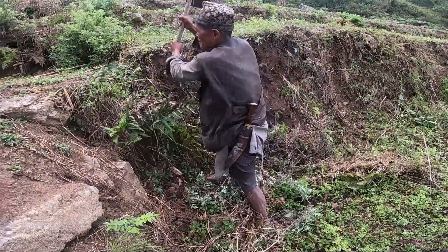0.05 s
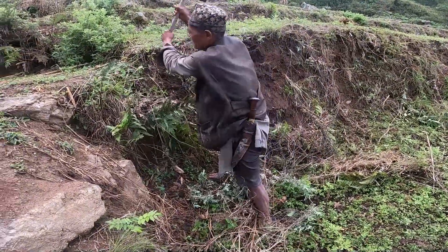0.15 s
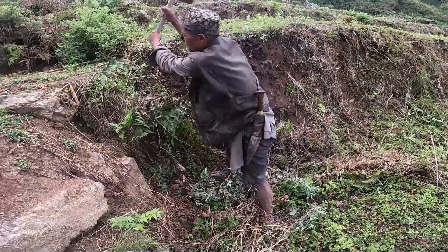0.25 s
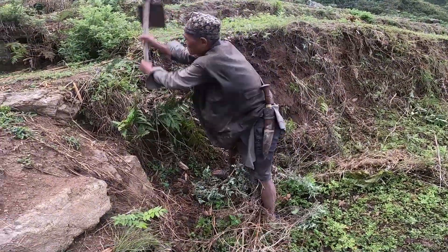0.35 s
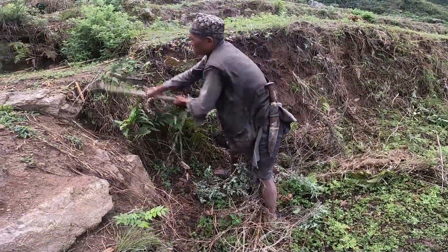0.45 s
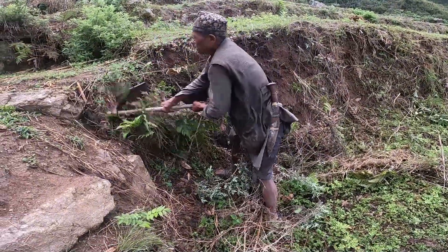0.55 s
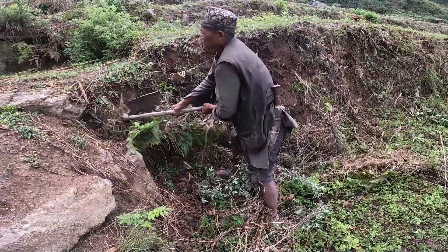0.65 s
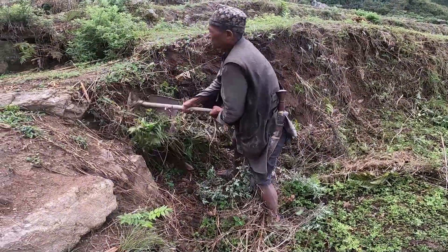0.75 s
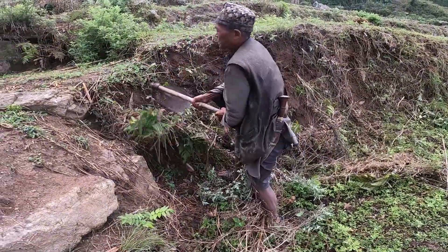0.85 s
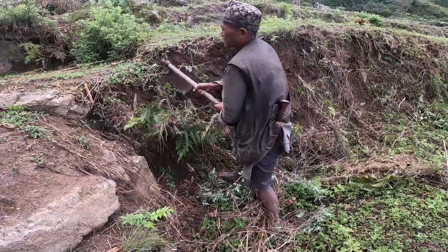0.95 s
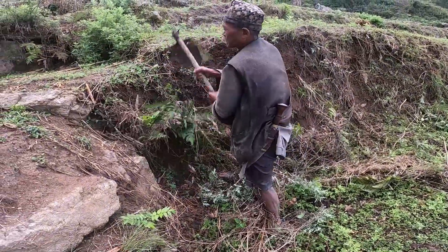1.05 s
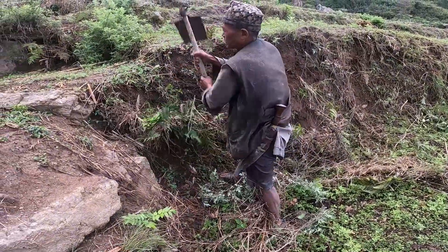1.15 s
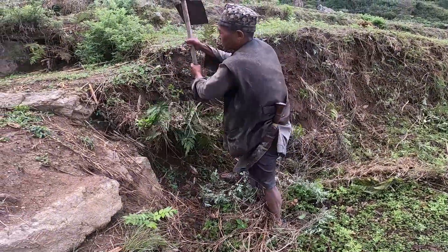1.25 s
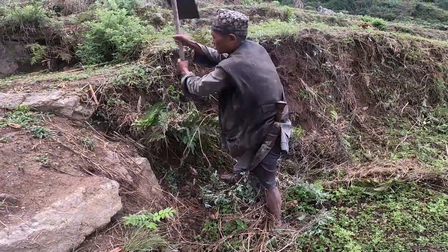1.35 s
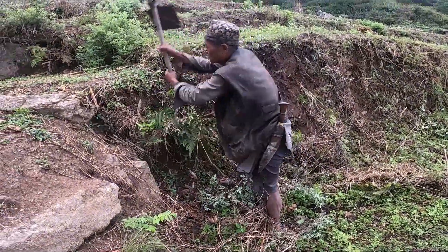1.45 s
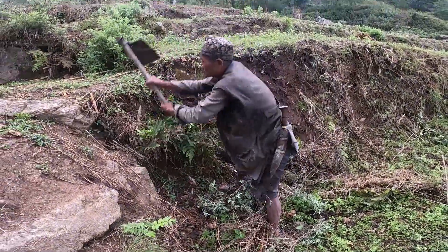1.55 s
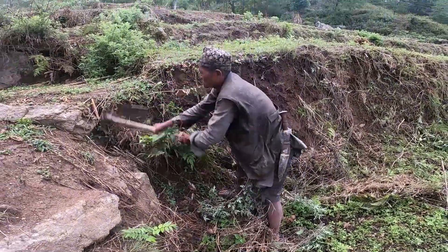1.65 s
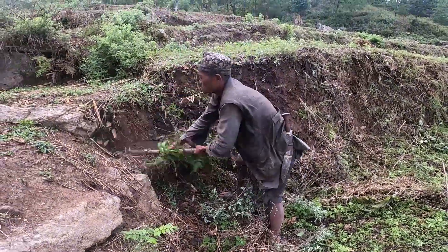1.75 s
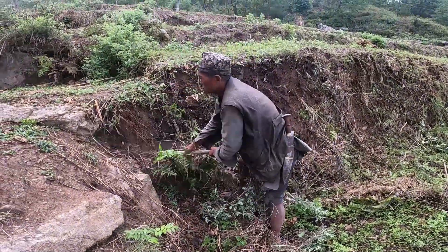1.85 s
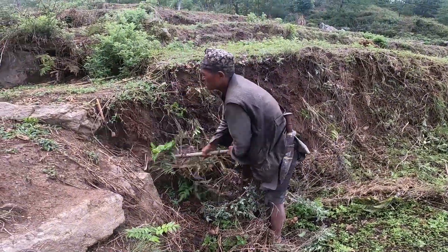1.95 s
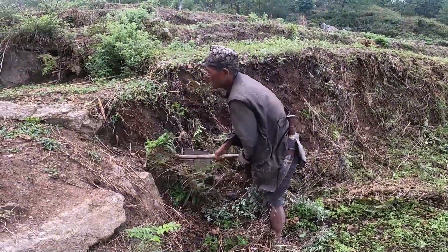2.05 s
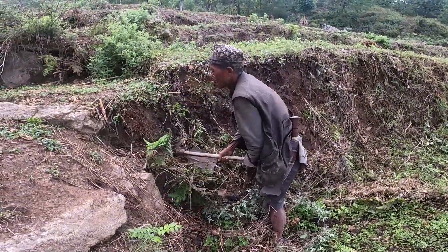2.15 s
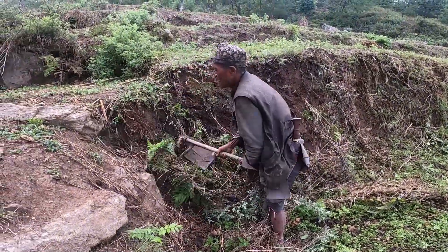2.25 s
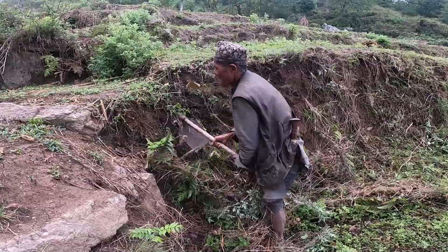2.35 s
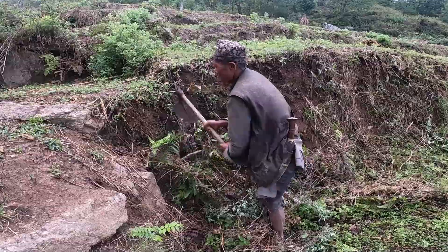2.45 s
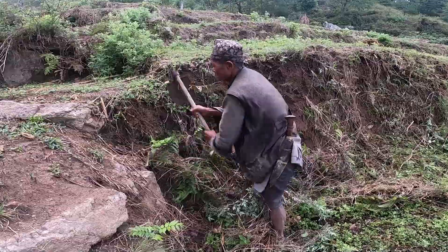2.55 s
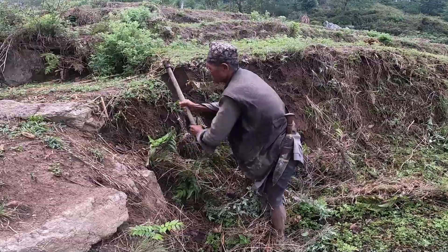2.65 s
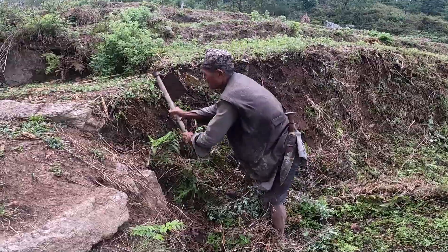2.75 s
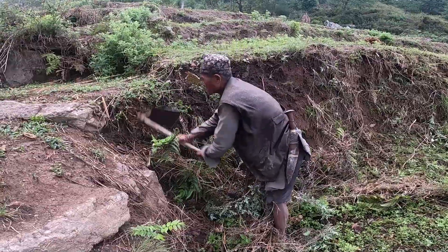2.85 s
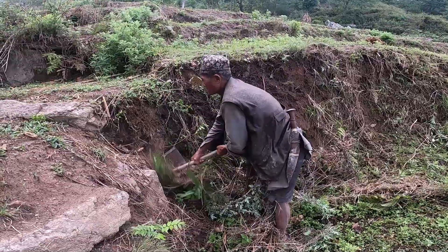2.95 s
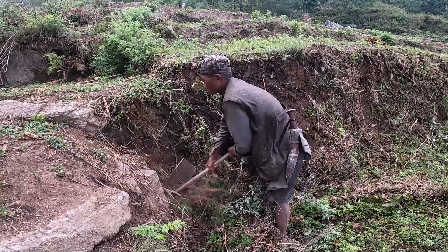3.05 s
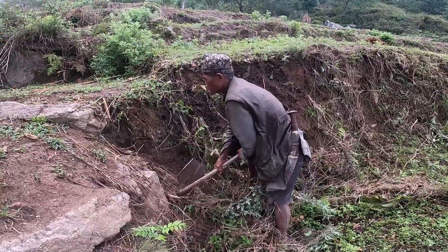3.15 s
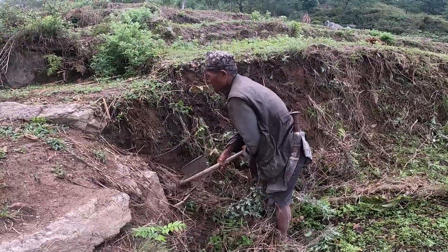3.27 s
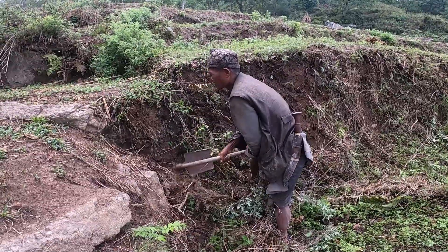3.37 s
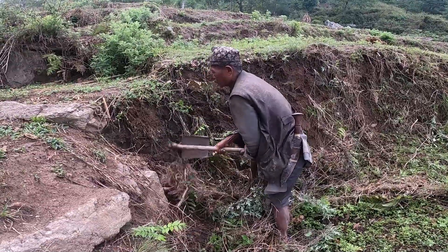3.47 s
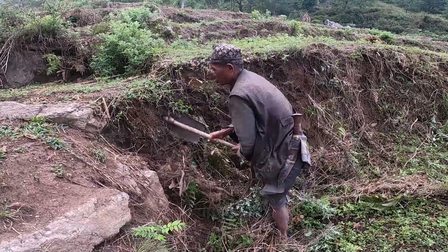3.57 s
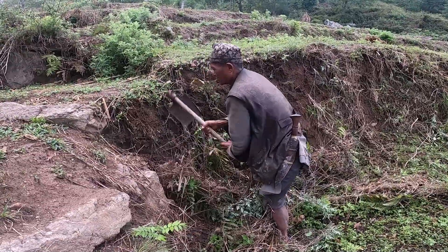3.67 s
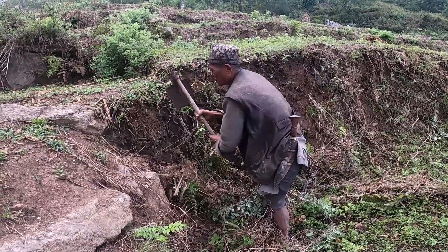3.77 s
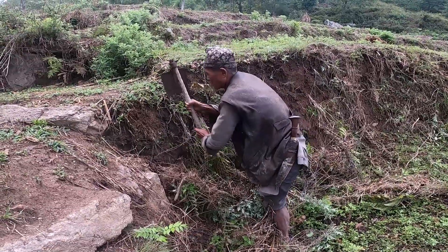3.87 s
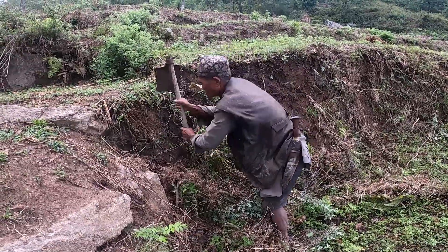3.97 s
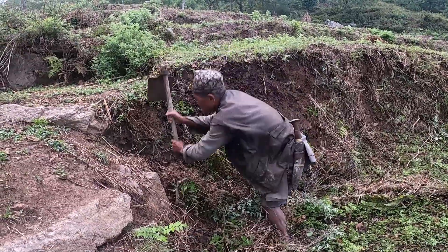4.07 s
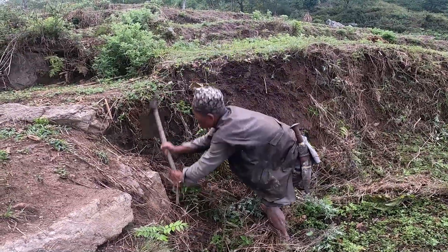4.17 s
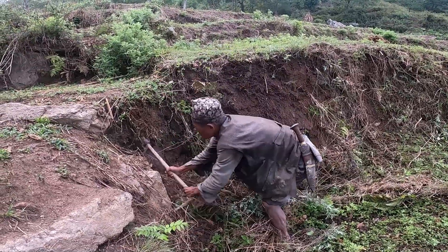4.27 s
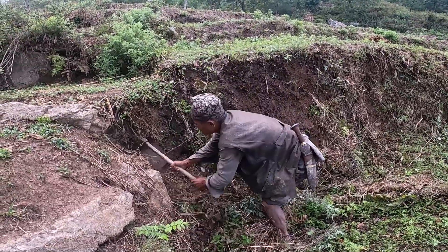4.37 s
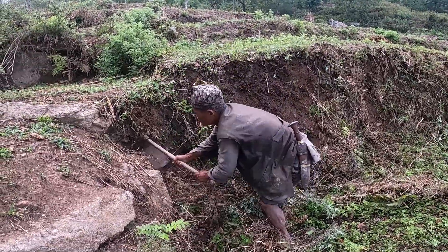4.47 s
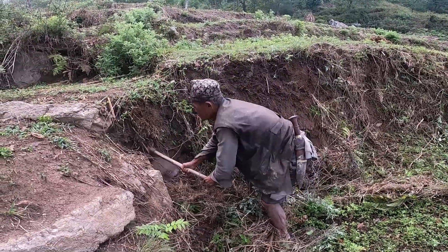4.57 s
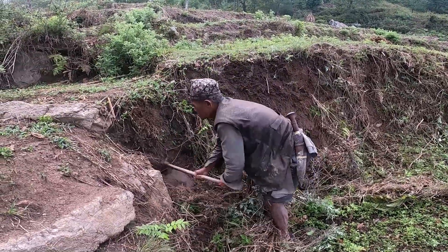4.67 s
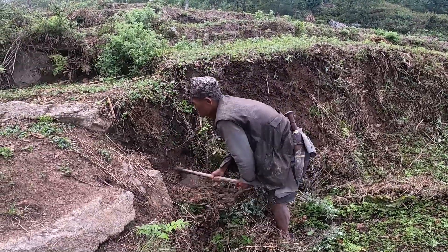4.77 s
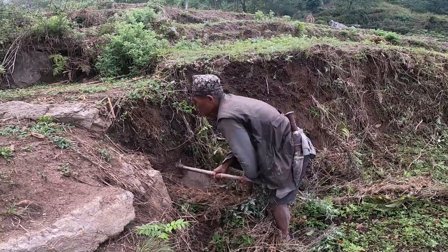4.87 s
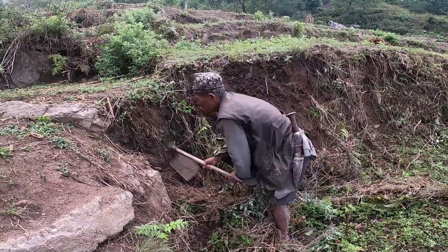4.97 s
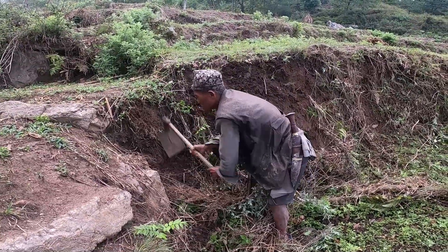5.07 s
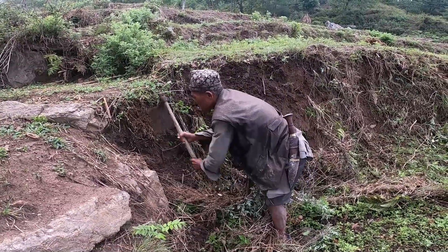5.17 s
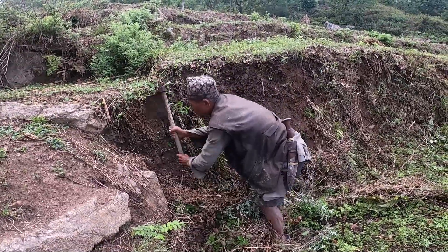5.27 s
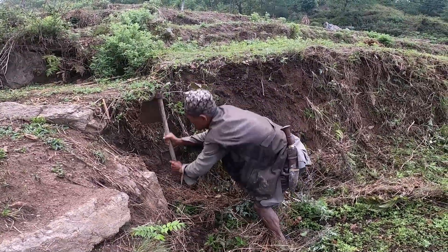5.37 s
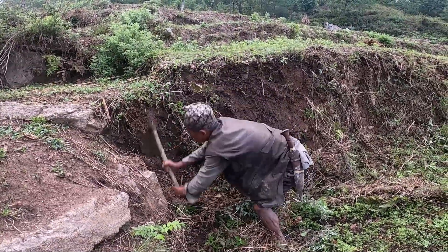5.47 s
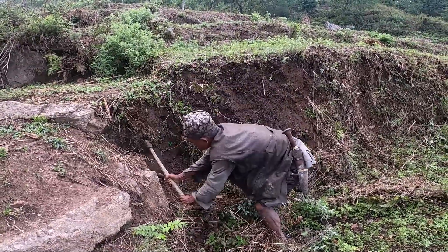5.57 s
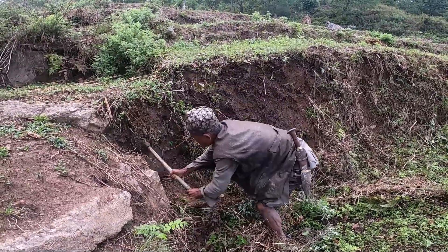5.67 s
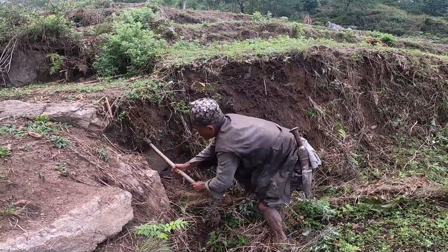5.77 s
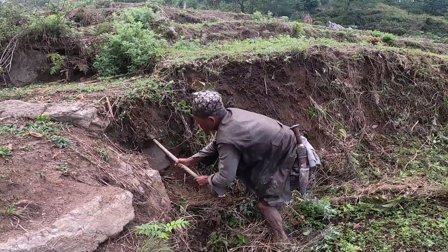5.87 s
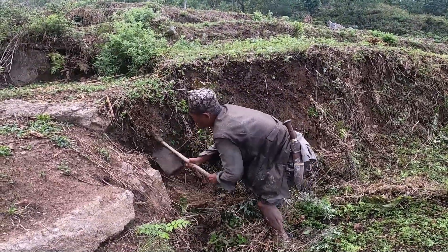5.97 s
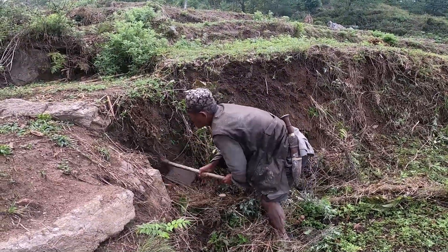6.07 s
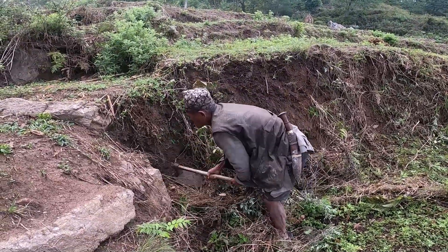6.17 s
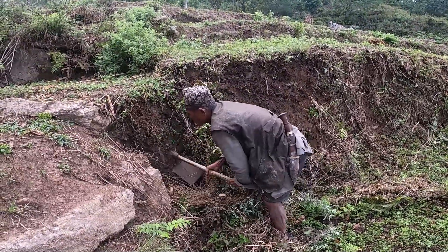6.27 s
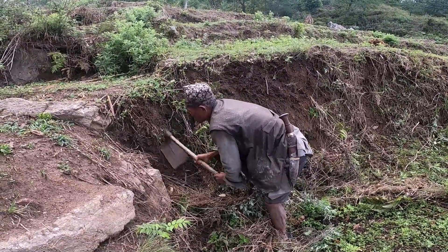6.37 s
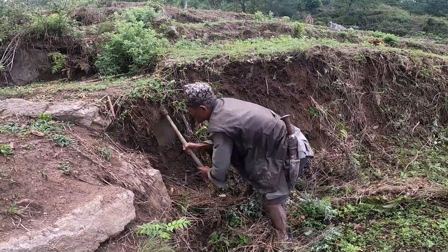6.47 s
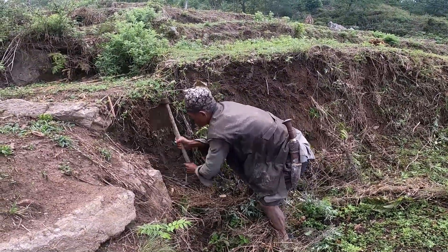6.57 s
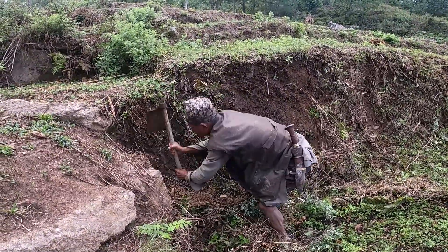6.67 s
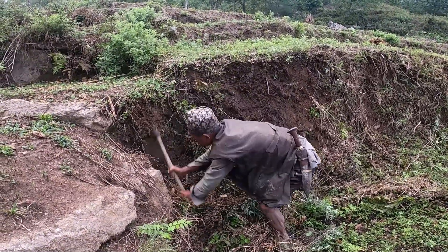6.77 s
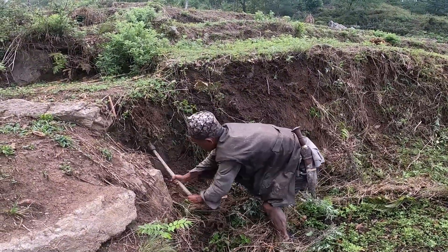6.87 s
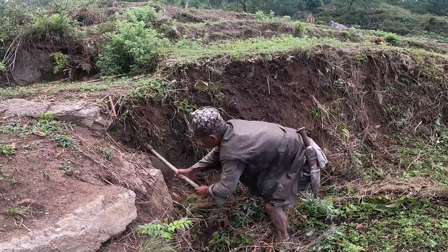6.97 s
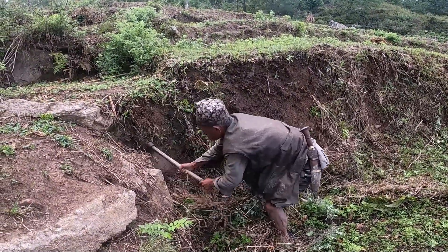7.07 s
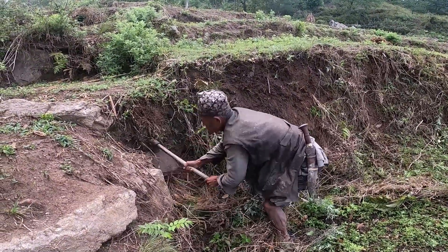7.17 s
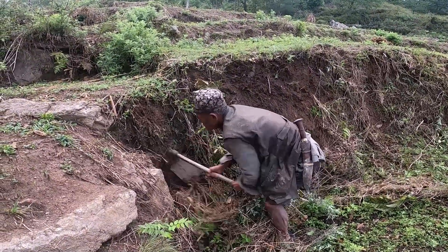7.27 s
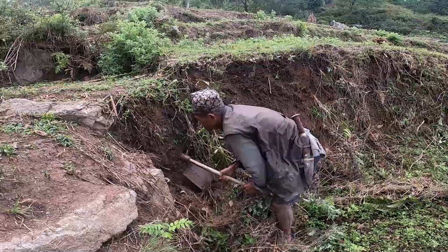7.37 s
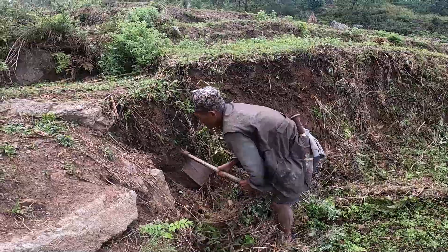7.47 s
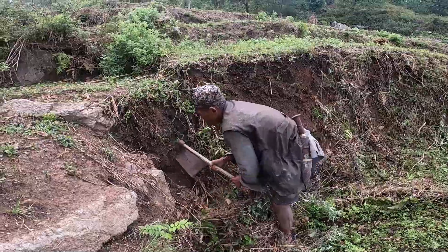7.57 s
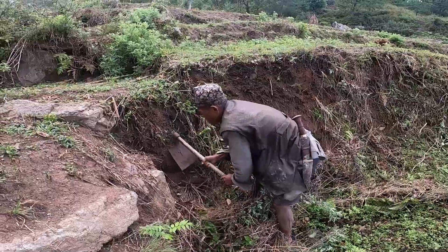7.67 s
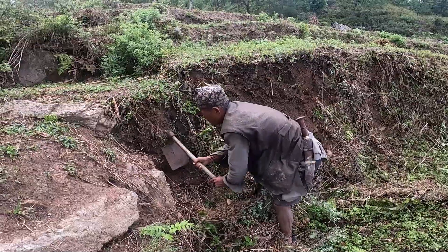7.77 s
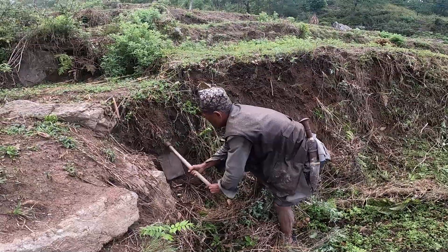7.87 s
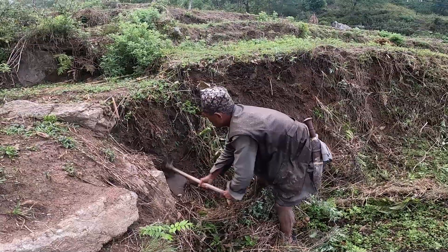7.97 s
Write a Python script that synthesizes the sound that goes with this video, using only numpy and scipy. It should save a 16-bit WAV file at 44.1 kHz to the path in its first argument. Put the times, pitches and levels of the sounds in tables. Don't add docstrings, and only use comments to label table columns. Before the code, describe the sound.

A quiet, open hillside with a soft airy hiss and a few faint bird whistles. At about 0.6 s a steel hoe bites into an earth bank with a gritty crunch and deep thump; crumbs and grit pour down until about 1.5 s. At 1.8 s comes the loudest blow, a hard, hollow double knock on stone with a short blade ring, then soil spilling past 2 s and a small knock at 2.4. Another crunching stony blow lands at 3.05 s, with pebbles ticking to 3.6. Further chops fall at 4.4 s, with pattering clods after, and at 5.65 s, short and thumpy. At 6.05 and 6.24 s the blade clangs brightly against stones. A duller blow at 6.95 s leads to rattling clods and pouring grit around 7.2-7.5 s, then it fades. Distant three-note bird clucks recur from 2.8 s, clearest from 3.5 s, with a tiny trill near 6.4-7 s.

```python
import sys
import numpy as np
from scipy import signal
from scipy.fft import rfft, irfft
from scipy.io import wavfile

SR = 44100
rng = np.random.default_rng(int(sys.argv[2]) if len(sys.argv) > 2 else 0)


def pcm_store(signal):
    levels = np.round(np.clip(np.atleast_2d(signal), -1, 1) * 32767)
    wavfile.write(sys.argv[1], SR, levels.astype(np.int16).T)


def gain_from_db(level_db):
    decades = np.asarray(level_db, float) / 20
    return 10 ** decades


N = 353814

# f/Hz, level/dB per Hz
AIR_COLOUR = [(15, -47), (25, -23), (97, -30), (212, 16.5), (463, 1), (734, -33), (1070, 11.5),
              (2350, -4.5), (4250, 13), (5280, -21), (12200, -25), (14800, -21), (16000, -54)]
# f/Hz, level/dB per Hz
GRIT_COLOUR = [(240, -42), (400, -2), (676, -8.5), (1030, -3.5), (1270, -9.5), (1630, 6), (3870, 8),
               (5690, -4), (8630, -0.5), (10100, -4.5), (12300, -15), (15000, -23), (16000, -39)]
# f/Hz, level/dB per Hz
SHEAR_COLOUR = [(130, 5), (300, -1), (600, 0), (1000, 2.5), (1800, 4.5)]
# f/Hz, likeness/0 to 1
EAR_LIKENESS = [(60, .997), (500, .985), (1500, .97), (3000, .93), (6000, .85), (15000, .5)]
# f/Hz, level/dB
LEFT_LEAN = [(60, .55), (180, .8), (550, .5), (800, 1.5), (1500, .6), (2900, 3.1), (4500, 1.1), (6500, -.5),
             (10000, -1.3), (14000, -5)]
# f/Hz, phase/rad
LEFT_LEAD = [(60, -.06), (250, -.12), (800, -.3), (1500, -.27), (2800, -.55), (6500, -.62), (12000, -.45)]
# f/Hz, level/dB
MIC_TREBLE = [(8000, -2.5), (10000, -0.5), (12500, -3), (14500, -8.5), (15700, -2.5)]

# start t/s, top t/s, end t/s, top f/Hz, level/dB
WHISTLE_ARCHES = [(.115, .12, .195, 1890, -57), (.222, .265, .33, 1660, -58),
                  (2.315, 2.33, 2.385, 2310, -59), (3.74, 3.84, 3.93, 1330, -63),
                  (3.74, 3.85, 3.87, 1830, -68), (3.945, 3.99, 4.01, 1270, -66),
                  (3.945, 4.065, 4.15, 1905, -56), (4.16, 4.24, 4.26, 1900, -66),
                  (5.055, 5.065, 5.14, 1900, -57), (.968, .975, 1.05, 1900, -55),
                  (5.16, 5.19, 5.2, 1680, -61), (5.215, 5.222, 5.27, 1660, -60),
                  (7.545, 7.665, 7.77, 1900, -57), (7.82, 7.87, 8.4, 1880, -74)]
# start t/s, end t/s, period/s, from f/Hz, to f/Hz
PIP_TRILL = (6.345, 7.05, .066, 2940, 3110)
# t/s, length/s, f/Hz, level/dB
BIRD_PEEPS = [
    (6.823, 0.042, 2270, -59),
    (6.87, 0.018, 2130, -52),
    (6.853, 0.016, 1900, -53),
    (6.89, .012, 2170, -58),
    (6.855, .02, 3150, -57),
    (6.82, .014, 1070, -58),
]
# t/s, level/dB, pitch/ratio, spacing/s
CLUCK_CALLS = [
    (2.757, -56, .97, .075),
    (3.452, -50, 1.02, .064),
    (4.148, -49, 1.0, .067),
    (4.822, -48, 1.0, .067),
    (5.383, -61, .95, .16),
    (5.506, -48.5, 1.04, .064),
    (6.212, -47, .99, .067),
    (6.665, -64, 1.0, .07),
    (6.911, -49, 1.01, .066),
    (7.629, -50, 1.0, .067),
]
# first f/Hz, settled f/Hz, drop time/s, level/dB, level lost with the drop/dB
CLUCKS = [
    (1210, 770, .026, .5, -19),
    (1130, 770, .018, -3, -12),
    (1100, 850, .016, -3.5, -6),
]

# t/s, flow as grit level/dB, lumpiness/dB
SOIL_FLOW = [(0, -47, -7.5), (.5, -57, -6.5), (.73, -40.5, -9.5), (1.0, -39.5, -6), (1.52, -52.5, -7.5),
             (1.81, -55.5, -12), (1.94, -38, -6), (2.85, -62.5, -5.5), (4.4, -52, -2.5), (4.8, -43.5, -3.5),
             (5.29, -62, -2.5), (5.94, -53.5, -6.5), (6.2, -45.5, -3.5), (6.54, -69, -8.5), (6.86, -61, 1),
             (7.22, -50, -5.5), (7.39, -38.5, -9), (8.02, -66, -2.5)]
# start t/s, deepest t/s, grit level/dB, t60 after/s, coarse relative level/dB
EARTH_BURSTS = [(0.55, 0.583, -26, 0.23, 2.5), (0.742, 0.758, -45.5, 0.41, 0), (0.795, 0.839, -41, 0.23, -2),
                (1.752, 1.812, -26.5, 0.25, -3.5), (1.79, 1.84, -34, 0.097, 1.5),
                (2.994, 3.05, -27, 0.66, -7), (3.2, 3.413, -55, 2.4, -22), (3.532, 3.562, -43, 0.85, 1),
                (4.294, 4.381, -28.5, 0.23, -2), (4.543, 4.602, -46, 0.049, 5.5),
                (4.695, 4.832, -41, 0.47, -3), (5.609, 5.653, -30, 0.095, 1.5),
                (5.94, 6.024, -44.5, 0.19, 7.5), (6.85, 6.951, -38.5, 0.15, 0.5),
                (7.274, 7.28, -47.5, 0.63, 12.5)]
# t/s, peak level/dB, settled f/Hz, t60/s
DEEP_THUMPS = [(0.0, -55, 90, .25), (.578, -21.5, 40.3, 0.26), (1.859, -37.5, 60.5, 0.25),
               (3.053, -36, 45.7, 0.29), (3.555, -58, 50, 0.31), (3.639, -48, 92, 0.12),
               (4.377, -21, 50.7, 0.18), (4.588, -52, 45, 0.49), (5.65, -17.5, 44, 0.13),
               (6.051, -23, 38, 0.15), (6.945, -27, 42.3, 0.17), (7.209, -40, 80, 0.19),
               (7.252, -42, 71, 0.4)]
# t/s, peak level/dB, settled f/Hz, t60/s
HOLLOW_THUDS = [(1.769, -24, 206, 0.043), (1.827, -18, 569, 0.1), (1.847, -5, 210, 0.031),
                (1.939, -40, 242, 0.17), (1.942, -30.5, 663, 0.1), (6.054, -18, 690, 0.028),
                (2.392, -45.5, 229, 0.11), (3.048, -19, 260, 0.05), (3.563, -41, 243, 0.45),
                (4.364, -16, 440, 0.04), (5.652, -25, 150, .06), (5.643, -17, 500, .03),
                (5.66, -28, 300, .06), (7.206, -36, 702, 0.1), (7.064, -27.5, 209, 0.072),
                (7.278, -30.5, 222, 0.14), (7.284, -25, 646, 0.11), (7.322, -29, 627, 0.048)]
# t/s, peak level/dB, f/Hz, snap relative level/dB
LOUD_CRUMBS = [(.76, -32, 2440, -12), (0.839, -29, 1520, -18), (.868, -29, 2600, -12),
               (.995, -40, 1300, -12), (1.029, -39, 2900, -14), (1.076, -28.5, 1150, -25),
               (1.105, -42, 1300, -15), (1.144, -33, 2500, -5), (1.224, -40, 2270, -5),
               (1.254, -37, 2550, -6), (1.383, -43, 3370, -8), (1.483, -41, 2370, -12),
               (1.601, -47, 3600, -1), (1.915, -30, 900, -10), (2.307, -54, 1200, -25),
               (2.424, -37, 3000, -13), (2.543, -39.5, 1670, -38), (2.62, -49, 3600, -5),
               (.618, -27, 1600, -26), (4.338, -45, 2000, -21), (5.607, -33, 2100, -25),
               (4.632, -38, 2090, -15), (2.812, -61, 3000, 13), (2.955, -52, 1610, -22),
               (3.129, -25, 2700, -10), (3.314, -37, 2500, -15), (3.557, -30, 750, -6),
               (3.561, -24, 2400, -10), (4.187, -37.5, 1520, 0), (5.009, -32, 2170, -23),
               (5.308, -50, 2800, -7.5), (6.021, -32, 1530, -3), (6.036, -31, 1100, -12),
               (7.16, -42, 1630, -15), (7.188, -42, 2000, -12), (7.196, -42, 2300, -12),
               (7.216, -27, 1700, -20), (7.279, -27, 1900, -8), (7.288, -22, 1300, -10),
               (7.306, -33, 1700, -10), (7.328, -21, 1600, -15), (7.377, -34, 2040, -3),
               (7.388, -32, 2500, -15), (7.4, -31, 3300, -8), (7.415, -26, 3000, -12),
               (7.445, -34, 3000, -15), (4.572, -29, 1200, -8), (4.58, -32, 1900, -8),
               (4.766, -28, 3400, -12), (4.88, -29, 3400, -12)]
# t/s, peak level/dB, f/Hz, snap relative level/dB
PEBBLE_FALLS = [(.072, -38, 1470, -14), (.544, -42, 1040, -8), (0.729, -44, 1520, 8),
                (1.941, -43, 1540, -33), (2.088, -30.5, 1200, 1), (3.013, -28, 3200, -10),
                (3.555, -25, 2500, -6), (3.939, -37, 1310, -8), (4.45, -33, 720, -3.5),
                (4.536, -37, 1190, 3), (4.566, -33.5, 1660, 1), (4.593, -32, 1140, -10),
                (4.698, -35, 720, -8), (4.757, -28, 1620, -7), (5.593, -28, 2400, -40),
                (5.885, -33, 646, -7), (5.938, -51, 1510, -15), (5.955, -31.5, 646, -7.5),
                (5.978, -31, 1230, -11), (6.299, -50.5, 1520, 12), (6.623, -65, 1540, 19.5),
                (6.856, -40, 710, -35), (7.064, -44, 790, -6), (7.105, -34.5, 1630, -27),
                (7.171, -29, 1950, -20), (7.529, -44, 3050, -12), (0.445, -42.5, 1580, -7),
                (3.185, -28, 1680, -2.5), (5.228, -46, 1610, -15)]
# t/s, peak level/dB, f/Hz, t60/s, snap relative level/dB
STONE_STRIKES = [(.567, -21, 1700, 0.06, -19), (.646, -17, 2300, 0.03, -20), (1.77, -7.5, 1300, 0.057, -41),
                 (1.77, -6.5, 2115, 0.017, -38), (1.829, -6.5, 1248, 0.047, -38),
                 (2.393, -15.5, 1234, 0.038, -69), (3.027, -20, 3300, 0.04, -10),
                 (3.047, -12.5, 1330, 0.052, -18), (4.363, -11, 1760, 0.025, -30),
                 (4.365, -14.5, 1110, 0.037, -43), (4.835, -22.5, 888, 0.032, -11),
                 (5.643, -12, 760, 0.02, -22), (5.65, -14, 1110, 0.025, -30), (5.648, -20, 1700, .04, -20),
                 (6.004, -21, 1660, 0.035, -12), (6.056, -10, 1180, 0.06, -13),
                 (6.24, -18, 2550, 0.052, -31), (6.24, -13.5, 1660, 0.054, -52),
                 (6.24, -12, 3373, 0.039, -48), (6.945, -22, 1710, 0.04, -18.5),
                 (7.205, -17, 1800, 0.02, -18), (7.254, -18.5, 730, 0.03, -33),
                 (7.282, -21.5, 1520, 0.071, -19), (7.322, -23, 1780, 0.053, -22)]

# f/Hz, level/dB, t60/s
EDGE_MODES = [(5243, -3, .045), (5500, -10, .08), (6370, -14, .1), (7140, -1, .1), (8650, -12, .09),
              (9620, -9, .09), (12050, -20, .07)]
# t/s, level/dB
EDGE_HITS = [
    (4.593, -48),
    (5.956, -52),
    (6.004, -47),
    (6.054, -32),
    (6.241, -37),
    (6.258, -46),
    (6.14, -52),
    (2.088, -48),
]
BLADE_PITCHES = [764, 1050, 1270, 1502, 1674, 1873, 2163, 2600, 2805, 3165, 3262, 4495, 5000, 7140]
# level/dB, t60/s
BLADE_MODES = [(-3, 0.08), (-12, 0.43), (-3.5, 0.09), (-9, 0.52), (-7, 0.06), (-1, 0.077), (-10, 0.063),
               (0.5, 0.028), (-12.5, 0.63), (-10, 0.29), (0, 0.07), (-9.5, 0.18), (-10, 0.044),
               (-16, 0.066)]
# t/s, level/dB, share of free decay, edge tilt/dB per octave, extra main mode level/dB
BLADE_CLANGS = [(0.64, -35, 1.2, 3, 5), (1.785, -36, 5, 1.5, 22), (1.773, -37, 2, 4, 6),
                (1.83, -22.5, .3, -11, 4), (1.942, -31, 0.66, -19.5, 15), (2.396, -55.5, 2.7, 0, -29),
                (2.48, -48, 0.85, -1, 6), (3.012, -36, 0.95, 7, 1), (4.593, -45, 0.4, 10, -2),
                (3.048, -29, 0.6, -17, 1), (3.554, -51, .7, 3, -19), (4.628, -52, 1, 0, 11),
                (4.895, -43, 0.35, 3, 8), (4.775, -42, .5, 5, -2), (5.008, -54.5, 1.9, 4, 11),
                (5.955, -53, 0.29, 13.5, -10), (5.594, -44, 0.43, 2, 0), (6.003, -35, 1.3, 1, -1),
                (6.054, -19.5, 0.82, -0.5, 9), (6.242, -29, 0.3, 5.5, -10), (6.258, -32, 0.94, 2.5, 7),
                (2.97, -60, 1, -3, 11), (7.205, -46, 0.3, 0, 8), (7.28, -46, 0.4, -13, 13)]
BLADE_STOPS = [.72, 1.822, 1.94, 2.006, 2.7, 3.2, 3.9, 4.67, 5.4, 5.65, 6.054, 6.86, 7.254, 7.42]


def rms_one(x):
    return x / np.sqrt(np.mean(x ** 2) + 1e-20)


def at_hz(points, hz):
    points_hz, values = np.transpose(points)
    return np.interp(np.log(hz), np.log(points_hz), values)


def band(x, low_hz, high_hz):
    sos = signal.butter(2, [low_hz, min(high_hz, .45 * SR)], "band", fs=SR, output="sos")
    return signal.sosfilt(sos, x)


def drift(rate):
    r = np.exp(-80 * np.pi * rate / SR)
    slow = signal.lfilter([1], [1, -2 * r, r * r], rng.standard_normal(N // 40 + 2002))[2000:]
    return np.interp(np.arange(N) / 40, np.arange(len(slow)), rms_one(slow))


def ring(x, hz, t60):
    r = gain_from_db(-60 / (max(t60, .003) * SR))
    w = 2 * np.pi * hz / SR
    return signal.lfilter([0, np.sin(w)], [1, -2 * r * np.cos(w), r * r], x)


def coloured(excite, spectrum, low_hz, high_hz, patchy_db):
    out, together = 0, drift(9.3)
    bands = max(2, round(2 * np.log2(high_hz / low_hz)))
    edges = np.geomspace(low_hz, high_hz, bands + 1)
    for k, (low, high) in enumerate(zip(edges, edges[1:])):
        mid, side = band(excite[k % 2], low, high)
        hz = np.sqrt(low * high)
        alike = np.clip(at_hz(EAR_LIKENESS, hz), 0, 1)
        flicker_db = patchy_db * (together + 0.055 * drift(43))
        stereo = np.sqrt(1 + alike) * mid + np.sqrt(1 - alike) * side * [[1], [-1]]
        out = out + gain_from_db(at_hz(spectrum, hz) + flicker_db) * stereo
    return rms_one(out)


def open_air():
    hiss = coloured(rng.standard_normal((2, 2, N)), AIR_COLOUR, 29.6, 14460, patchy_db=-1.5)
    breeze = rms_one(band(rng.standard_normal(N), 13, 84))
    return gain_from_db(-64.5) * hiss + gain_from_db(-85.0) * breeze


def bird_note(rows, at_s=0, db=0, ratio=1):
    s, hz, level_db = np.transpose(rows)
    t = np.arange(s[0], s[-1], 1 / SR)
    fade = np.clip(np.minimum(t - s[0], s[-1] - t) / 0.004, 0, 1)
    phase = 2 * np.pi * np.cumsum(ratio * np.interp(t, s, hz)) / SR
    wave = np.sin(phase) * gain_from_db(np.interp(t, s, level_db) + db + 7.0) * fade
    out, start = np.zeros(N), round((s[0] + at_s) * SR)
    out[start:start + len(t)] = wave
    return out


def clucks():
    out, u = np.zeros(N), np.linspace(0, .046, num=16)
    notes = []
    for high, low, drop_s, db, lost_db in CLUCKS:
        drop = np.exp(-(u / drop_s) ** 2)
        notes.append(np.c_[u, low + (high - low) * drop, db + lost_db * (1 - drop) - 150 * u])
    spread = [1.5, .015]      # dB, pitch ratio
    lots = rng.standard_normal((len(CLUCK_CALLS), len(notes), 2)) * spread
    for (s, db, ratio, gap), lot in zip(CLUCK_CALLS, lots):
        for k, note in enumerate(notes):
            out += bird_note(note, s + k * gap, db + lot[k, 0], ratio + lot[k, 1])
    return out


def whistles():
    out, waver = np.zeros(N), drift(40)
    for first, top, last, hz, db in WHISTLE_ARCHES:
        s = np.linspace(first, last, num=24)
        rise = .1 * min(1, 30 * (top - first)) * ((top - s) / (top - first)) ** 2
        fall = .19 * np.abs((s - top) / (last - top)) ** 2.5
        loss = np.where(s < top, rise, fall)
        level_db = db - 48 * loss + 2.6 * np.interp(s, np.arange(N) / SR, waver)
        out += bird_note(np.c_[s, hz * (1 - loss), level_db][s < N / SR])
    return out


def birds():
    near = clucks() + whistles()
    for s, length, hz, db in BIRD_PEEPS:
        near += bird_note([(s, hz, db), (s + length, hz, db - 6)])
    start, end, period, from_hz, to_hz = PIP_TRILL
    pip = [(0, from_hz, -66), (.015, (from_hz + to_hz) / 2, -65), (.03, to_hz, -69)]
    for s in np.arange(start, end, period):
        near += bird_note(pip, s)
    echoes = sum(gain_from_db(db) * np.roll(near, round(lag_s * SR))
                 for lag_s, db in [(.017, -19), (.083, -19), (.13, -18)])
    return near * gain_from_db(2.2 * drift(40)) + echoes


def grains(per_s, spread_db, hiss):
    born = rng.random(N) < per_s * gain_from_db(2.2 * drift(18)) / SR
    sizes = born * gain_from_db(spread_db * np.minimum(rng.exponential(1, N), 1.7))
    taps = rms_one(signal.lfilter([1], [1, -.9], sizes))
    return (taps + hiss) * rng.standard_normal((2, 2, N))


def soil():
    s, flow_db, lump_db = np.transpose(SOIL_FLOW)
    t = np.arange(N) / SR
    flow_db, lump_db = np.interp(t, s, flow_db), np.interp(t, s, lump_db)
    grit, clods = gain_from_db(flow_db), gain_from_db(flow_db + lump_db)
    sand = gain_from_db(flow_db - 6 - 0.34 * lump_db)
    rumble = gain_from_db(-66.5 + 0.41 * (flow_db + 49))
    shear = np.zeros(N)
    for start, deepest, db, t60, coarse_db in EARTH_BURSTS:
        span = slice(round(start * SR), round((deepest + 1) * SR))
        u = t[span]
        rise_db = -27.5 * np.clip((deepest - u) / max(deepest - start, .002), 0, 1)
        decay_db = -60 * np.clip(u - deepest, 0, 1) / t60
        cut = gain_from_db(db + rise_db + decay_db) * np.clip((u - start) / 0.016, 0, 1)
        grit[span] += cut
        sand[span] += gain_from_db(-3.5 - 2.8 * max(coarse_db - 6.0, 0)) * cut
        shear[span] += gain_from_db(coarse_db + 0.2 * rise_db) * cut
    fine = grains(per_s=600.0, spread_db=4.0, hiss=1.8)
    coarse = grains(per_s=250.0, spread_db=3.3, hiss=1.6)
    out = grit * coloured(fine, GRIT_COLOUR, 1773, 4760, patchy_db=1.7)
    out += sand * coloured(fine[..., ::-1], GRIT_COLOUR, 4115, 13820, patchy_db=0.97)
    out += clods * coloured(coarse, GRIT_COLOUR, 483, 1728, patchy_db=2.0)
    out += shear * coloured(fine[::-1], SHEAR_COLOUR, 143.0, 1787, patchy_db=3.0)
    out += rumble * coloured(coarse, SHEAR_COLOUR, 143, 480, patchy_db=0.0)
    return out


def bank():
    out, t = np.zeros(N + SR), np.arange(SR // 2) / SR
    waves = [(*row, 150) for row in DEEP_THUMPS]
    waves += [(*row, 1.112 * row[2]) for row in HOLLOW_THUDS]
    noises = rng.standard_normal((len(waves), len(t)))
    for (s, db, last_hz, t60, first_hz), noise in zip(waves, noises):
        hz = last_hz + (first_hz - last_hz) * np.exp(-t / 0.011)
        phase = 2 * np.pi * np.cumsum(hz) / SR
        heave = 0.29 * (last_hz < 65) * np.sin(phase / 2)
        rough = rms_one(band(noise, .5 * last_hz, 1.31 * first_hz))
        wave = np.sin(phase) + heave + 0.62 * rough
        envelope = (1 - np.exp(-t / 0.0011)) * gain_from_db(db - 2.0 - 60 * t / t60)
        out[round(s * SR):][:len(t)] += envelope * wave
    return out[:N]


def knocks():
    out, size = np.zeros(N + SR), SR // 10
    t = np.arange(size) / SR
    hits = [(*row, 0) for row in STONE_STRIKES]
    hits += [(s, db, hz, 0.044, snap_db, 0) for s, db, hz, snap_db in PEBBLE_FALLS]
    hits += [(s, db, hz, 0.028, snap_db, -4) for s, db, hz, snap_db in LOUD_CRUMBS]
    noises = rng.standard_normal((len(hits), size))
    for (s, db, hz, t60, snap_db, extra_db), noise in zip(hits, noises):
        crack_db = -13 - 0.44 * (db + 21.5) - 0.047 * (snap_db + 18) + extra_db
        blow = noise * np.exp(-t / .0014)
        burst = noise * gain_from_db(-60 * t / max(.8 * t60, .004))
        body = ring(blow, hz, t60) + 0.54 * ring(blow, 1.9 * hz, t60) + 0.21 * burst
        dull = band(body, 0.37 * hz, 1.0 * hz)
        crack = gain_from_db(crack_db + 15) * band(burst, 1360, 3600)
        snap = gain_from_db(snap_db + 6.5) * band(burst, 2780, 7600)
        out[round(s * SR):][:size] += gain_from_db(db) * (0.54 * dull / np.abs(dull).max() + crack + snap)
    return out[:N]


def slope(x):
    t = np.arange(SR // 4) / SR
    tails = band(rng.standard_normal((2, len(t))), 300, 8600) * gain_from_db(-60 * t / 0.098) * (t > .004)
    return signal.fftconvolve(x[None], tails / np.sqrt(SR * 0.0015), axes=1)[:, :N]


def edge():
    out, t = np.zeros(N + SR), np.arange(SR // 4) / SR
    hz, level_db, t60 = np.transpose(EDGE_MODES)[:, :, None]
    sines = np.sin(2 * np.pi * hz * t)
    lots = rng.standard_normal((len(EDGE_HITS), len(EDGE_MODES), 1))
    for (s, db), lot in zip(EDGE_HITS, lots):
        modes = np.sum(gain_from_db(db + level_db + 2 * lot - 60 * t / t60) * sines, axis=0)
        out[round(s * SR):][:len(t)] += modes * np.minimum(t / .001, 1)
    return out[:N]


def blade():
    out, t = np.zeros(N + SR), np.arange(SR * 3 // 4) / SR
    hz = np.c_[BLADE_PITCHES]
    level_db, t60 = np.transpose(BLADE_MODES)[:, :, None]
    sines = np.sin(2 * np.pi * hz * t)
    number = np.arange(len(BLADE_MODES))[:, None]
    main, twist = number == 3, number == 1
    lots = rng.standard_normal((len(BLADE_CLANGS), len(BLADE_MODES), 1))
    for (s, db, share, tilt_db, main_db), lot in zip(BLADE_CLANGS, lots):
        twist_db = .6 * max(-main_db, 0) - 2 * max(main_db - 10, 0)
        struck_db = level_db + lot + tilt_db * np.log2(hz / 1500) + main_db * main + twist_db * twist
        modes = np.sum(gain_from_db(struck_db - 60 * t / (share * t60)) * sines, axis=0)
        free_s = min(stop for stop in BLADE_STOPS if stop > s + .01) - s
        stilled = gain_from_db(-60 * np.clip(t - free_s, 0, 1) / .025)
        out[round(s * SR):][:len(t)] += gain_from_db(db) * modes * stilled * np.minimum(t / 0.0014, 1)
    return out[:N] * gain_from_db(2.0 * drift(27))


def scene():
    far_birds = birds() * gain_from_db([[.5], [-.5]])
    blows = knocks() + edge() + blade()
    blows = blows + gain_from_db(-19) * slope(blows)
    return open_air() + far_birds + soil() + bank() + blows


def top_cut(x):
    return signal.sosfilt(signal.butter(12, 16390, fs=SR, output="sos"), x)


def record(dry):
    hz = np.maximum(np.arange(N // 2 + 1) * SR / N, 1)
    lean = gain_from_db(at_hz(LEFT_LEAN, hz) / 2) * np.exp(.5j * at_hz(LEFT_LEAD, hz))
    treble = gain_from_db(at_hz(MIC_TREBLE, hz)) * (hz < 15780)
    ports = irfft(rfft(dry) * [lean, 1 / lean] * treble, N)
    return top_cut(ports)


dry = scene()
out = record(dry)
pcm_store(out)
```